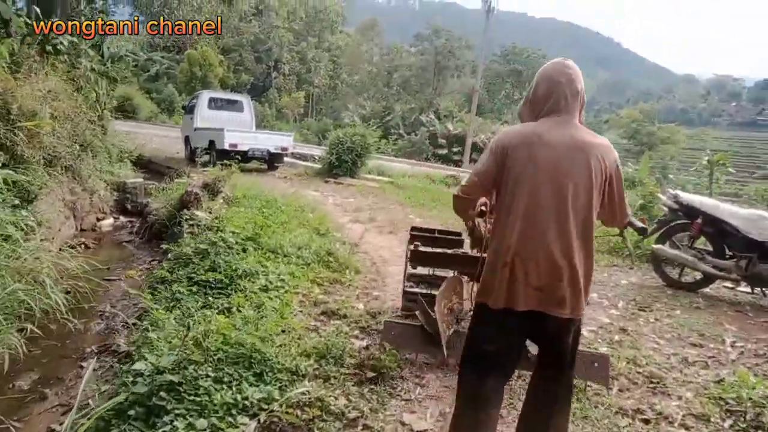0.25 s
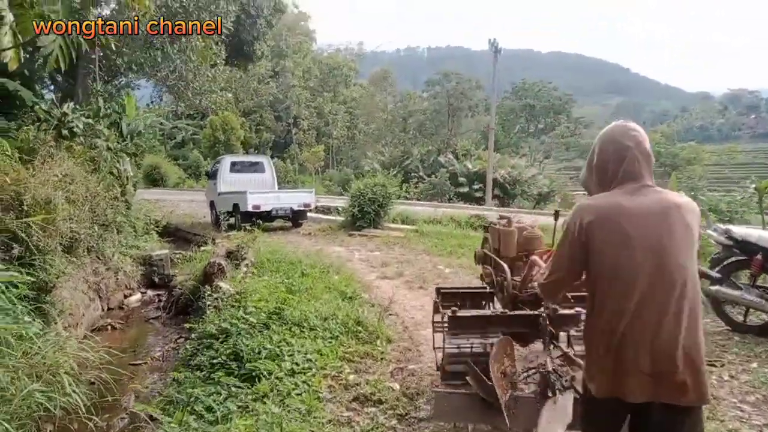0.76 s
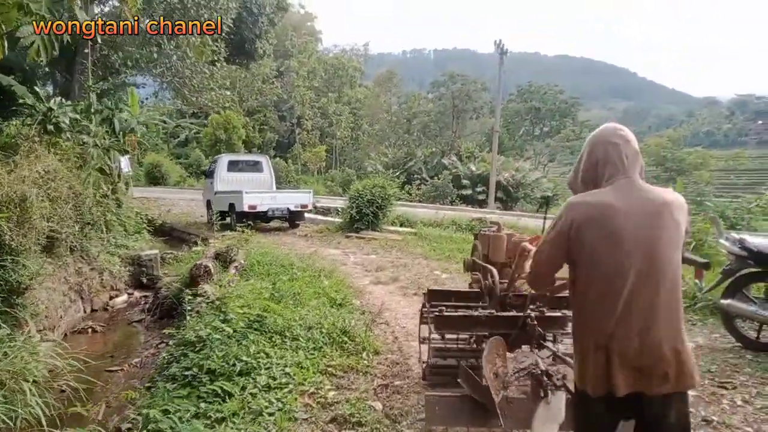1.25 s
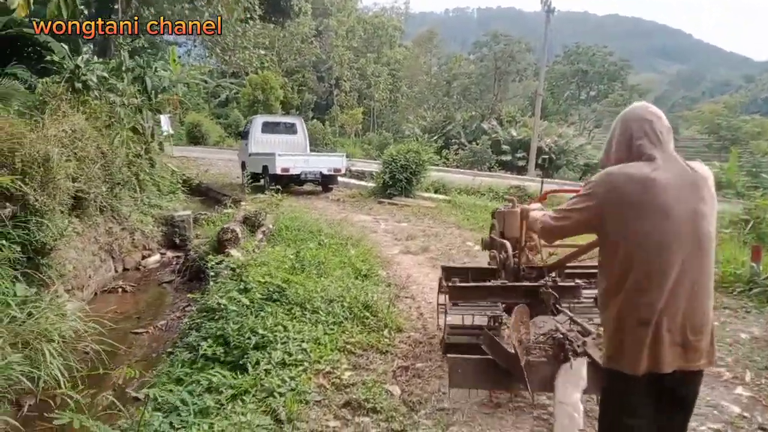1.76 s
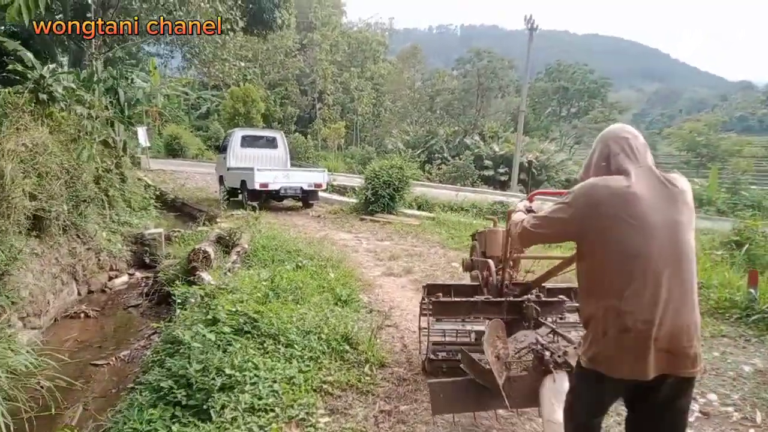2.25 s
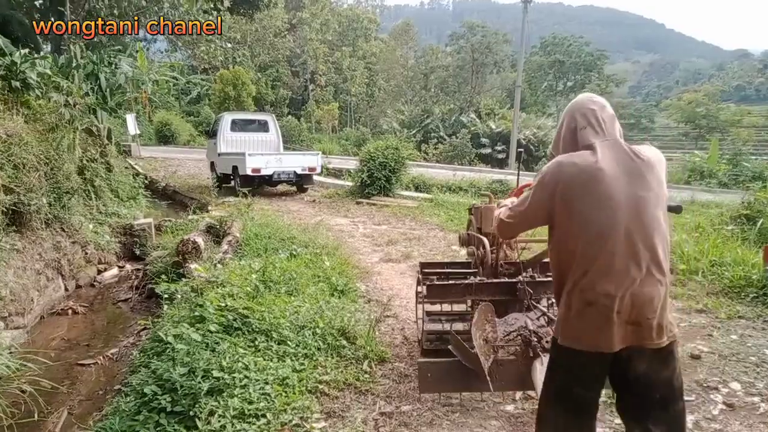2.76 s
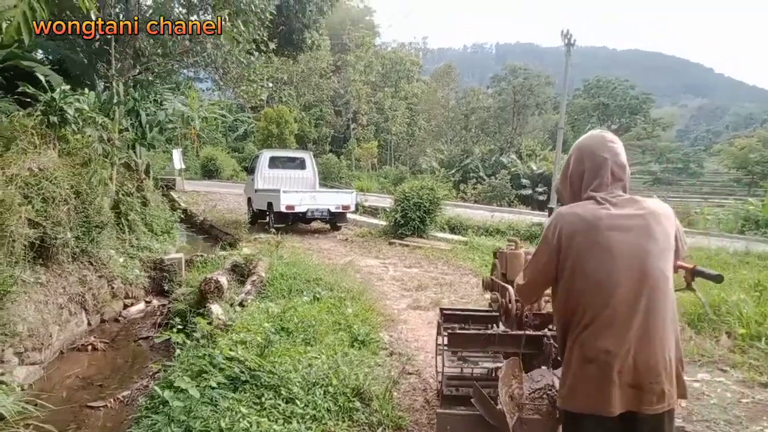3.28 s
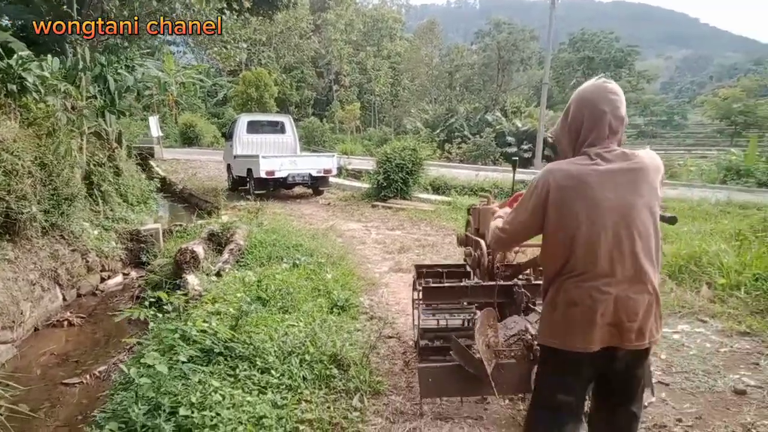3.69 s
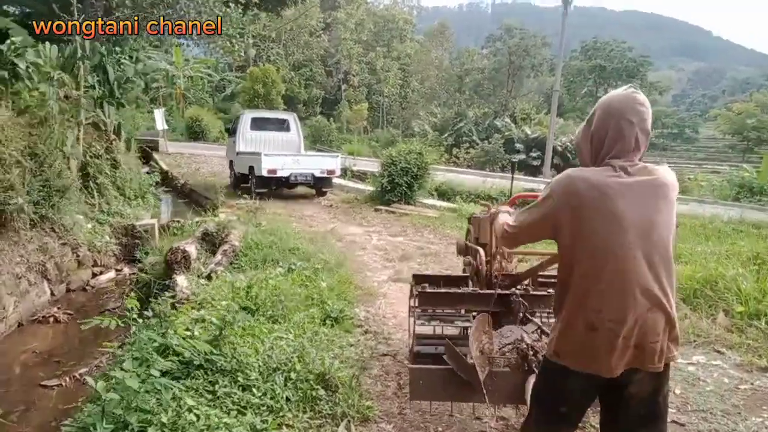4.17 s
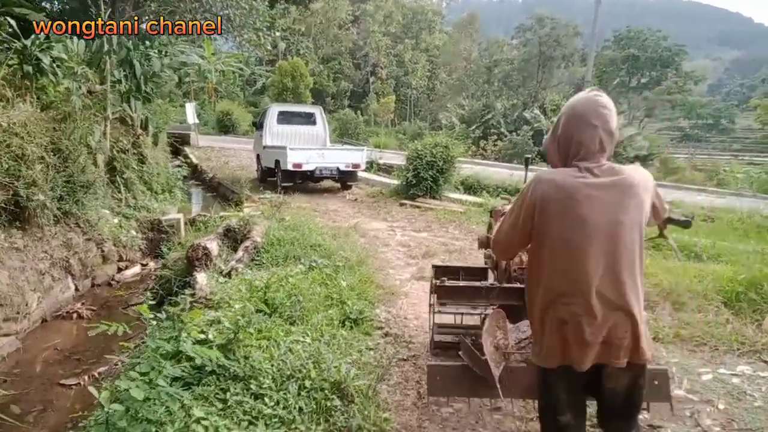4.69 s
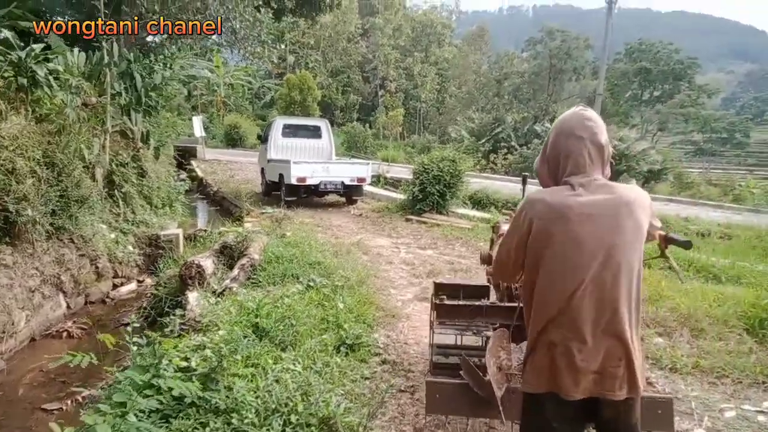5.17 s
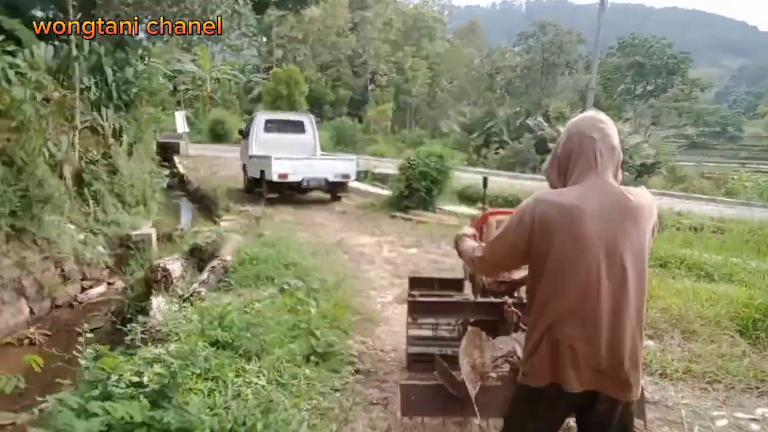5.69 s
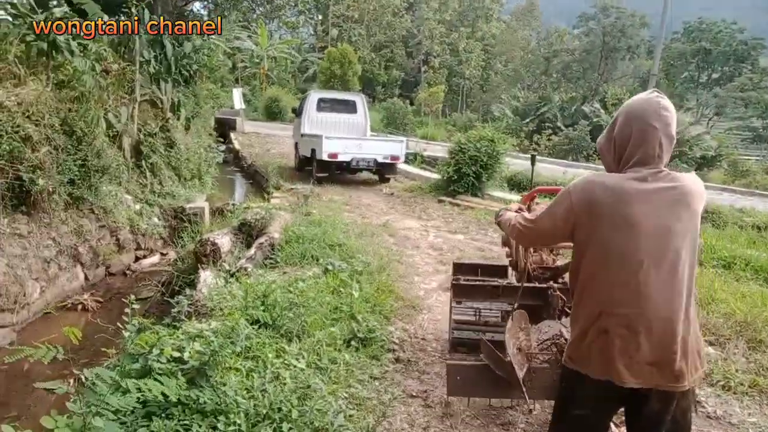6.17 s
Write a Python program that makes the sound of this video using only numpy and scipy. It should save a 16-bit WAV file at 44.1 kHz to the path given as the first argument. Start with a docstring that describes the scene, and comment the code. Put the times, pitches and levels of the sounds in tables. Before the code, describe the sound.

A walk-behind tractor's single-cylinder diesel chugs close by throughout, each beat made of an exhaust pop, a hard knock and a low thump. For the first two seconds it runs at about seven beats a second, while the steel cage wheels and plough clank, ping and jingle busily over stones. Grit crunches lightly and the gears and wheels rumble underneath. The engine starts easing after one second, and the rattling thins from about two seconds. Between roughly 3.3 and 4.2 seconds the knock almost disappears as the engine slows further, leaving softer pops and a few clanks. The knock then returns at an idle of about five beats a second, lasting to the end at around 6.4 seconds. More sharp clanks come between 4.5 and 5.5 seconds. The setting is outdoors, with a short echo from an earth bank.

```python
"""A stony path beside an earth bank: a walk-behind tractor's single-cylinder diesel slows to idle.
Each cycle gives an exhaust pop, a combustion knock and an intake thump. The steel cage wheels and
the plough clank and rattle over the stones; grit crunches under them. Gears and wheels rumble,
and the bank returns a short echo of engine and clanks."""
import sys
import numpy as np
from scipy import signal
from scipy.fft import rfft, irfft, next_fast_len
from scipy.io import wavfile
from scipy.ndimage import uniform_filter1d, map_coordinates

SR = 44100
rng = np.random.default_rng(int(sys.argv[2]) if len(sys.argv) > 2 else 0)


def master(y):
    """Save y as 16-bit WAV."""
    cut = np.clip(np.atleast_2d(y).T, -1, 1)
    pcm = np.round(cut * 32767)  # scale
    wavfile.write(sys.argv[1], SR, pcm.astype(np.int16))


N = 283553

# Resonances. Each row: frequency in Hz, relative level in dB, T60 in seconds.
MUFFLER_MODES = [(173.7, 8, 0.019), (338, -5, 0.04), (667, 4, 0.012), (91, -20.5, 0.53)]
BLOCK_MODES = [(953, -2.5, 0.044), (1193, -11.5, 0.072), (1252, 8, 0.056), (1529, 0.5, 0.047),
               (3120, 6.5, 0.016), (3306, -9, 0.017)]
AIR_BOX_MODES = [(76, 0, .085), (170, -12, .06)]
STEEL_MODES = [(314, 2, 0.066), (675, 0.5, 0.061), (782, 10, 0.035), (920, 0, 0.08), (1265, -13.5, 0.12),
               (1418, -8.5, 0.04), (1557, -12, 0.085), (1914, -3.5, 0.11), (2068, -3, 0.079),
               (2350, -5.5, 0.076), (2796, -4.5, 0.19), (3487, -12.5, 0.21), (3450, -15, .14),
               (3927, -10.5, 0.12), (4250, -3.5, 0.098), (4645, -0.5, 0.023), (5070, -2.5, 0.088),
               (5780, -0.5, 0.046), (6570, -6, 0.08)]
# Noise spectra. Each row: frequency in Hz, relative density in dB.
RUMBLE_SPECTRUM = [(24, -44), (40, -38), (87, -3), (166, 0.5), (400, -5), (800, -8.5), (3000, -35.5),
                   (6000, -44), (10000, -64), (15600, -63)]
FRAME_SPECTRUM = [(120, -35), (250, -11), (510, -13.5), (770, -0.5), (1100, -9.5), (1700, -11),
                  (3000, -14.5), (5000, -57)]
JINGLE_SPECTRUM = [(700, -15), (1500, -7.5), (2200, -1.5), (3200, -1.5), (4700, -13), (6500, -23),
                   (9900, -37), (16000, -77)]
GRIT_SPECTRUM = [(2000, -38), (5000, 20.5), (7500, 10), (9900, 1), (13000, -3.5), (15600, -2)]
# Shaking of the rolling frame. Each row: time in seconds, jingle level in dB.
SHAKE = [(0, -29.5), (.2, -31.5), (.33, -39.5), (.52, -25.5), (.72, -26), (.95, -24.5), (1.3, -30),
         (1.61, -32), (1.9, -27), (2.38, -37.5), (2.65, -34.5), (3.3, -38.5), (4.15, -42), (4.45, -32),
         (4.9, -44), (5.3, -36), (5.55, -41), (6.12, -42.5), (6.43, -37)]
# Stones crushed under the wheel bars. Each row: start in seconds, level in dB before filtering.
STONE_CRACKS = [(0.063, -49.5), (0.5187, -42), (0.5521, -43.5), (0.652, -50), (0.6847, -46), (0.8085, -66),
                (0.8395, -46.5), (1.288, -54), (1.6088, -46), (2.2807, -52), (2.608, -54), (3.002, -49.5),
                (3.319, -56), (3.4211, -57), (3.8297, -50.5), (3.9833, -51), (4.2392, -54), (4.733, -57.5),
                (5.192, -47), (5.311, -52), (5.681, -51), (5.847, -57), (6.1854, -56.5)]
# Light taps on one wheel bar. Each row: start in seconds, peak in dB, ring pitch in Hz.
BAR_TAPS = [(0.06, -20, 5860), (0.5794, -20, 5400), (0.7894, -28, 3930), (0.8244, -17, 5300),
            (1.05, -13, 5500), (1.2237, -15.5, 3920), (1.5344, -17, 5100), (1.9619, -15.5, 3900),
            (2.146, -16, 4760), (2.243, -20.5, 5600), (2.2803, -27, 4030), (3.3952, -25.5, 4730),
            (3.592, -19.5, 4620), (3.785, -27.5, 4700), (5.31, -27.5, 5860), (5.377, -22, 5100),
            (5.43, -20, 5100), (5.539, -28, 5860)]
# Steel on stone. Each row: start in seconds, level in dB, ring pitch in Hz, relative thud in dB.
CLANKS = [(0.013, -9.5, 1900, -7), (0.141, -3, 2770, -9.5), (0.225, -12.5, 2790, -29),
          (0.38, -16, 1430, 0.5), (0.424, -11, 1920, -5), (0.452, -16, 1980, -20),
          (0.561, -15.5, 2570, -18), (0.625, -15.5, 1910, 6), (0.768, -11.5, 1830, -4),
          (0.812, -12, 1100, -1), (0.837, -4.5, 2740, -16), (0.925, -9.5, 1480, -6),
          (0.948, -6, 2660, -13.5), (1.026, -8.5, 1420, -7), (1.059, -9, 2420, -29), (1.179, -10, 2340, -4),
          (1.28, -6, 1600, -6.5), (1.297, -3, 3100, -37), (1.326, -5.5, 2380, -31), (1.504, -8, 1390, -19),
          (1.531, -11, 2340, -12), (1.611, -10, 1420, -10.5), (1.849, -14, 1290, -2.5),
          (1.871, -8.5, 794, -11), (1.943, -13, 2340, -25), (2.123, -10, 2340, -9.5),
          (2.501, -14, 1190, 0.5), (2.66, -17.5, 2530, -24), (2.883, -13, 1330, -1.5),
          (3.002, -20, 3030, -13), (3.194, -22.5, 2500, -16), (3.25, -14.5, 2790, 2),
          (3.296, -18, 1410, -6), (3.396, -25, 2530, -5), (3.419, -15.5, 2330, 1),
          (3.672, -15.5, 1380, -1.5), (3.754, -18.5, 900, -3), (3.98, -18, 2500, -25),
          (4.115, -24, 2480, -2), (4.552, -8.5, 1900, -2.5), (4.845, -10, 1900, -4.5),
          (4.922, -20.5, 2100, -5), (5.032, -10.5, 1350, -1.5), (5.128, -12.5, 1370, -3.5),
          (5.194, -17.5, 3070, -7.5), (5.376, -14, 2100, -14), (5.403, -4.5, 1900, -7.5),
          (5.43, -14, 2050, -5), (5.519, -23, 1450, -1), (5.686, -22.5, 2400, -15), (5.728, -15, 2440, -4),
          (5.847, -17.5, 3380, -21), (5.926, -24.5, 900, 5), (6.311, -15, 2160, -35)]
# Crank speed. Each row: time in seconds, speed in rpm.
CRANK_SPEED = [(0, 838.6), (1.05, 838.4), (1.7, 766.0), (2.5, 765.5), (3.5, 715.4), (4.15, 603.1),
               (4.6, 594.2), (5.2, 593.3), (6.5, 621.8)]
# Combustion, starved while the engine slows. Each row: time in seconds, knock level in dB.
COMBUSTION = [(0, -15), (1.0, -11), (1.9, -11.5), (2.9, -12), (3.22, -12), (3.4, -34), (3.9, -38),
              (4.1, -25), (4.28, -12.5), (4.6, -14.5), (5.1, -12.5), (6.3, -12)]
WEAK_FIRINGS_S = [1.18, 1.48, 3.05, 4.49, 4.89, 5.5]

KNOCK_PHASE, THUMP_PHASE = .495, .73  # share of the cycle after the exhaust opens
FIRST_POP_S, IDLE_RPM, TOP_HZ = -.038, 600, 15750


def amp(db):
    return 10 ** (np.asarray(db) / 20)


def unit_rms(x):
    return x / np.sqrt(np.mean(x ** 2) + 1e-20)


def db_at(spectrum, hz):
    """Interpolate a spectrum on a log frequency axis."""
    knots_hz, db = np.transpose(spectrum)
    return np.interp(np.log(hz + 1), np.log(knots_hz + 1), db)


def filtered(x, response):
    """Apply a gain given as a function of Hz."""
    size = next_fast_len(len(x) + 4096)
    return irfft(rfft(x, size) * response(np.fft.rfftfreq(size, 1 / SR)), size)[:len(x)]


def shaped(x, spectrum):
    return filtered(x, lambda hz: amp(db_at(spectrum, hz)))


def noise_band(centre_hz, width_hz):
    return unit_rms(filtered(rng.standard_normal(N), lambda hz: np.exp(-((hz - centre_hz) / width_hz) ** 2)))


def wobble(rate_hz):
    """Smooth random curve."""
    knots = rng.standard_normal(int(N * rate_hz / SR) + 4)
    return map_coordinates(knots, [np.arange(N) * rate_hz / SR])


def add(track, start_s, sound):
    """Mix into a track padded by 1 s at each end."""
    track[round((start_s + 1) * SR):][:len(sound)] += sound


def ring(modes, attack_s, scatter_db, detune, tilt=((100, 0), (9000, 0))):
    """One blow on damped modes, each with random strength, tuning and decay; peak 1."""
    t = np.arange(SR // 10) / SR
    hz, db, t60_s = np.transpose(modes)[:, :, None]
    chance = rng.standard_normal((3, len(modes), 1))
    level_db = db + db_at(tilt, hz) + scatter_db * chance[0]
    decay_db = 60 * t / (t60_s * np.exp(.2 * chance[2]))
    partials = amp(level_db - decay_db) * np.sin(2 * np.pi * hz * (1 + detune * chance[1]) * t)
    blow = partials.sum(0) * (1 - np.exp(-t / attack_s)) * (1 - (t / t[-1]) ** 4)
    return blow / np.max(np.abs(blow))


def struck_bar(ring_hz, lift_db):
    """Steel modes, lifted near the bar's pitch."""
    return [(hz, db + lift_db * np.exp(-(np.log(hz / ring_hz) / .05) ** 2), t60_s)
            for hz, db, t60_s in STEEL_MODES]


def steel_response(hz):
    """The steel modes as parallel resonators."""
    return sum(amp(db) * 1j * hz * 4 / t60_s / (mode_hz ** 2 - hz ** 2 + 1j * hz * 4 / t60_s)
               for mode_hz, db, t60_s in STEEL_MODES)


def grains(spectrum, rate_hz, spread_db, decay_s):
    """Dense small impacts: noise under short random decays; rms 1."""
    hits = (rng.random(N) < rate_hz / SR) * amp(spread_db * np.clip(rng.standard_normal(N), -2, 2))
    t = np.arange(SR // 20) / SR
    power = np.abs(signal.fftconvolve(hits ** 2, np.exp(-t / decay_s))[:N])
    return unit_rms(shaped(np.sqrt(power) * rng.standard_normal(N), spectrum))


def whistle():
    """Faint, thin whistle, perhaps insects."""
    return noise_band(13830, 90) * amp(-84 + 2.5 * wobble(4))


def running_gear():
    """Gear and wheel rumble, fading as the tractor slows; wavering gear hum."""
    fade_db = np.interp(np.arange(N) / SR, [0, 1.5, 4, 6.43], [-31, -33.5, -39.5, -34.5])
    rumble = unit_rms(shaped(rng.standard_normal(N), RUMBLE_SPECTRUM))
    hum = noise_band(465, 22) * amp(-47.5 + 2.7 * wobble(5))
    return hum + amp(fade_db + 3.5 * wobble(25)) * rumble


def bank_echo(x, t60_s=.18, delay_s=.006):
    """Earth bank and bushes scatter back a short echo with little bass."""
    t = np.arange(SR // 4) / SR
    tail = amp(-60 * t / t60_s) * rng.standard_normal(len(t)) * (t > delay_s)
    echo = signal.fftconvolve(x, tail / np.linalg.norm(tail))[:N]
    return filtered(echo, lambda hz: hz / (hz + 400))


def stone_cracks(t60_s=.12):
    """Each crushed stone splinters in a gritty hiss."""
    track, t = np.zeros(N + 2 * SR), np.arange(SR // 8) / SR
    for start_s, db in STONE_CRACKS:
        splinters_db = 4 * np.repeat(rng.standard_normal(len(t) // 60 + 1), 60)[:len(t)]
        add(track, start_s, amp(db + splinters_db - 60 * t / t60_s) * rng.standard_normal(len(t)))
    return shaped(track[SR:SR + N], GRIT_SPECTRUM)


def bar_taps():
    """A tapped wheel bar rings the upper steel modes."""
    track, tilt = np.zeros(N + 2 * SR), [(1500, -32), (3400, 8), (6000, -5)]
    for start_s, db, hz in BAR_TAPS:
        ping = ring(struck_bar(hz, lift_db=13.6), attack_s=.0018, scatter_db=5.6, detune=.0043, tilt=tilt)
        add(track, start_s, amp(db) * ping)
    return track[SR:SR + N]


def chinks(count, decay_cycles):
    """Loose links and pebbles on steel: short tones at random pitches; rms 1."""
    when, decades, size = rng.random((count, 3)).T[:, :, None]
    hz, t = 1200 * 10 ** decades, np.arange(SR // 80) / SR
    envelope = np.exp(-hz * t / decay_cycles) * (1 - np.exp(-t / .001))
    level_db = db_at(JINGLE_SPECTRUM, hz) + 8 * decades + 12 * size
    tones = amp(level_db) * np.sin(2 * np.pi * hz * t) * envelope
    samples = (when * N).astype(int) + np.arange(len(t))
    return unit_rms(np.bincount(samples.ravel(), tones.ravel())[:N])


def rolling(cycle_phase):
    """Loose steel rattles and grit crunches, most just after each combustion jolt."""
    shake_db = np.interp(np.arange(N) / SR, *np.transpose(SHAKE))
    swing_db = shake_db - shake_db.mean()
    jolt_db = uniform_filter1d(3.5 - 9 * ((cycle_phase - KNOCK_PHASE) % 1), size=60)
    frame = grains(FRAME_SPECTRUM, rate_hz=350, spread_db=6.5, decay_s=.0069)
    tines = grains(JINGLE_SPECTRUM, rate_hz=250, spread_db=1.66, decay_s=.0027)
    ringing = unit_rms(filtered(tines, steel_response))
    jingle = unit_rms(tines + amp(-3) * ringing + chinks(count=1800, decay_cycles=12))
    clumps_db = 4 * wobble(16)
    grit = grains(GRIT_SPECTRUM, rate_hz=250, spread_db=4.3, decay_s=.004)
    return (amp(-33 + .46 * swing_db + jolt_db) * frame
            + amp(shake_db + jolt_db) * jingle
            + amp(-63 + 1.25 * swing_db + .4 * jolt_db + clumps_db) * grit)


def clanks(clatter_db=-13):
    """Stones ring the steel and set loose parts clattering; hard blows clatter longer."""
    track, t = np.zeros(N + 2 * SR), np.arange(SR // 10) / SR
    for start_s, db, ring_hz, thud_db in CLANKS:
        treble_db = -16 + 3.5 * np.log2(ring_hz / 2000) - .37 * thud_db
        tilt = [(100, thud_db + 4.5), (300, thud_db + 7), (750, .23 * thud_db + 1.5), (1100, .018),
                (3500, treble_db + 13), (6000, treble_db), (11000, treble_db - 15)]
        contact = amp(5.5 - 60 * t / .045) * (1 - np.exp(-t / .00094))
        burst = amp(-60 * t / (.17 + .003 * db)) * (1 - np.exp(-t / .0004))
        bounces = amp(5.6 * np.interp(t, t[::150], rng.standard_normal(len(t[::150]))))
        clatter = (contact + burst * bounces) * unit_rms(shaped(rng.standard_normal(len(t)), tilt))
        clang = ring(struck_bar(ring_hz, lift_db=5), attack_s=.0004, scatter_db=5, detune=.012, tilt=tilt)
        rebound = ring(STEEL_MODES[1::2], attack_s=.0004, scatter_db=5, detune=.006, tilt=tilt)
        rebound = np.pad(rebound, (rng.integers(300, 900), 0))[:len(t)]
        add(track, start_s, amp(db) * (clang + .5 * rebound + amp(clatter_db) * clatter))
    return track[SR:SR + N]


def engine(weak_loss_db=11):
    """Four-stroke cycles ring muffler, block and air box. Returns sound and cycle phase, 0-1."""
    track, t = np.zeros(N + 2 * SR), FIRST_POP_S + np.arange(N + SR // 4) / SR
    rpm = np.interp(t, *np.transpose(CRANK_SPEED))
    cycles = np.cumsum(rpm) / (2 * 60 * SR)  # two turns a cycle
    for k in range(int(cycles[-1])):
        pop_s, knock_s, thump_s = np.interp([k, k + KNOCK_PHASE, k + THUMP_PHASE], cycles, t)
        excess_rpm = np.interp(pop_s, t, rpm) - IDLE_RPM
        weak = np.min(np.abs(np.subtract(WEAK_FIRINGS_S, knock_s))) < .05
        pop_db = -18.5 + .016 * excess_rpm + .8 * rng.standard_normal()
        knock_db = np.interp(knock_s, *np.transpose(COMBUSTION)) - weak_loss_db * weak
        alternation_db = 7.5 * (-1) ** k * (excess_rpm > 200)
        thump_db = -24.5 - .025 * excess_rpm - alternation_db
        pop = ring(MUFFLER_MODES, attack_s=.0025, scatter_db=1.5, detune=.02)
        knock = ring(BLOCK_MODES, attack_s=.0003, scatter_db=4.9, detune=.019)
        thump = ring(AIR_BOX_MODES, attack_s=.02, scatter_db=1.5, detune=.04)
        add(track, pop_s, -amp(pop_db) * pop)
        add(track, knock_s, amp(knock_db) * knock)
        add(track, thump_s, amp(thump_db) * thump)
    return track[SR:SR + N], np.interp(np.arange(N) / SR, t, cycles) % 1


def scene():
    """Mono mix; caked earth dulls the blows."""
    motor, cycle_phase = engine()
    blows = filtered(motor + clanks(), lambda hz: 1 / (1 + 1j * hz / 6500) ** 4)
    echo = amp(-5) * bank_echo(blows)
    wheels = rolling(cycle_phase) + stone_cracks() + bar_taps()
    return (blows + echo + wheels + running_gear() + whistle())[None]


def record(dry):
    """Small microphone: deep bass rolls off, nothing above TOP_HZ."""
    return filtered(dry[0], lambda hz: (1j * hz / (50 + 1j * hz)) ** 4 * (hz < TOP_HZ))[None]


dry = scene()
out = record(dry)
master(out)
```